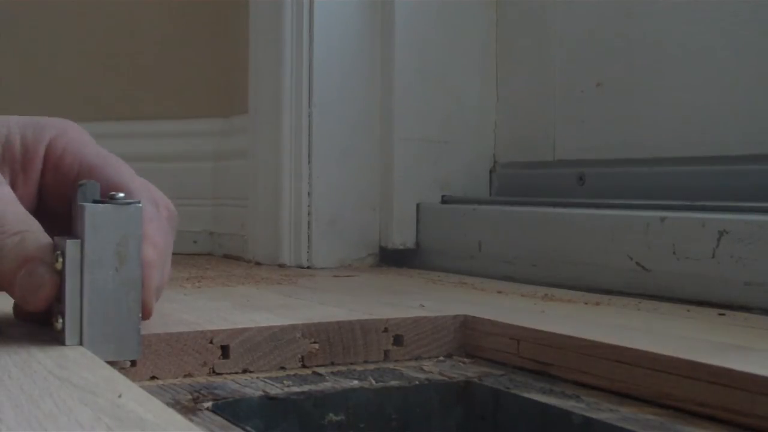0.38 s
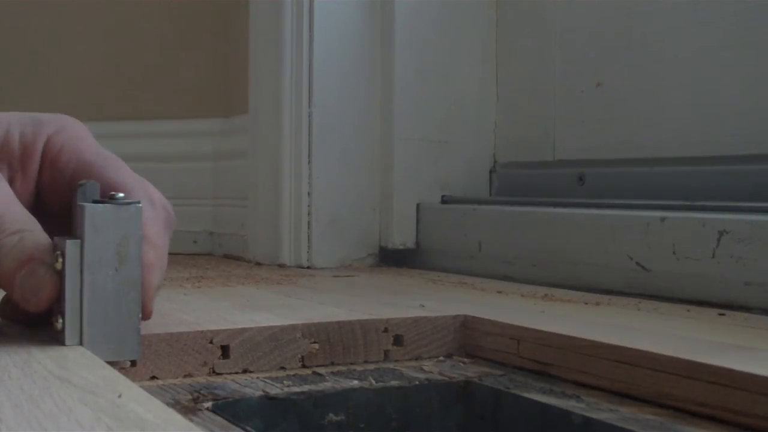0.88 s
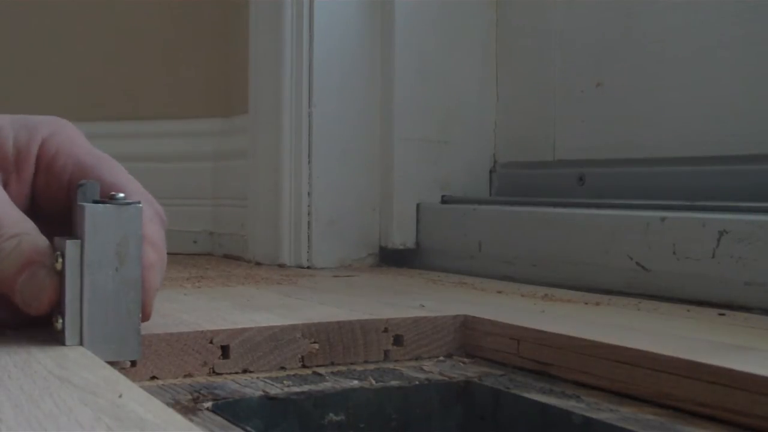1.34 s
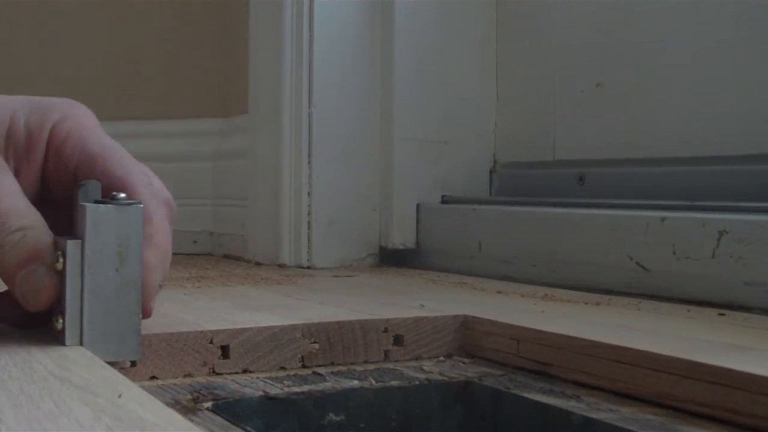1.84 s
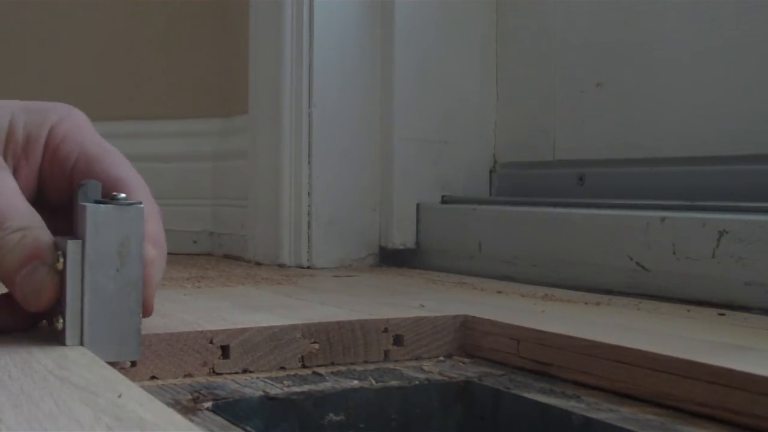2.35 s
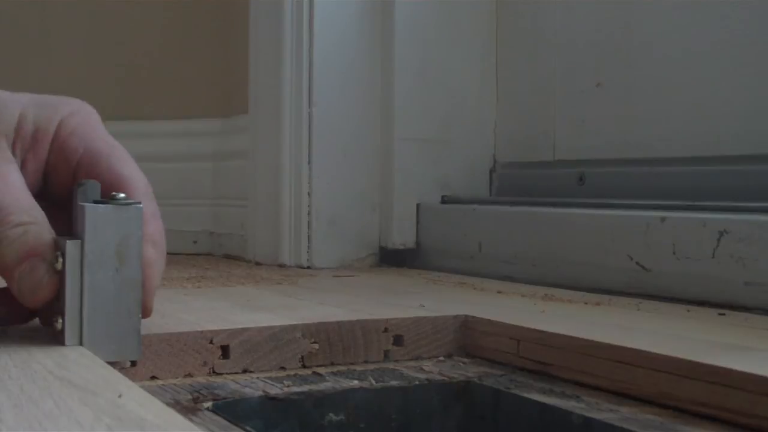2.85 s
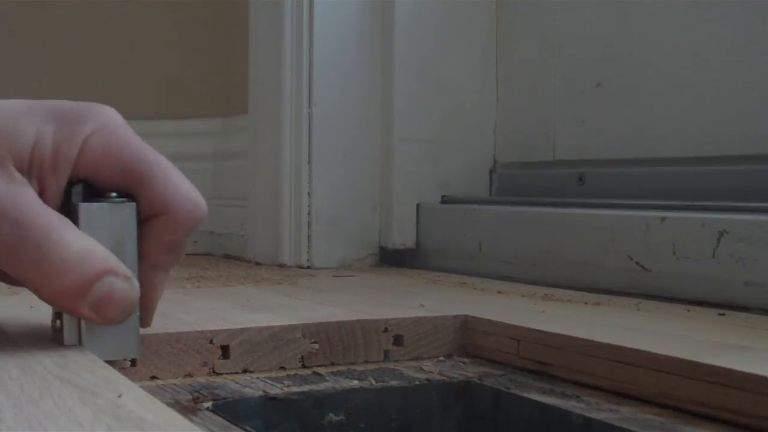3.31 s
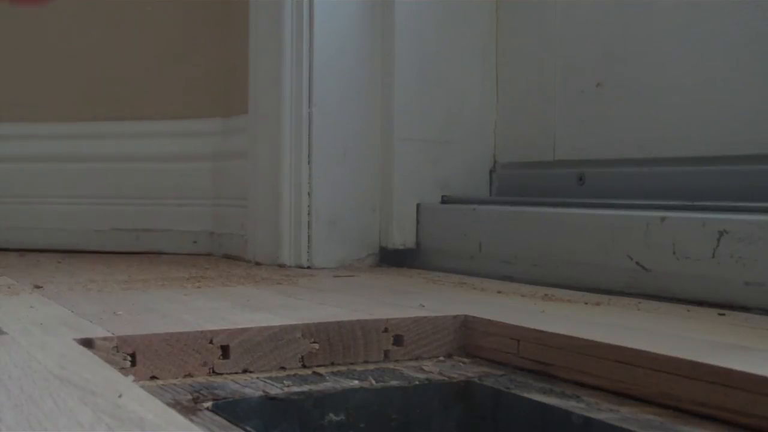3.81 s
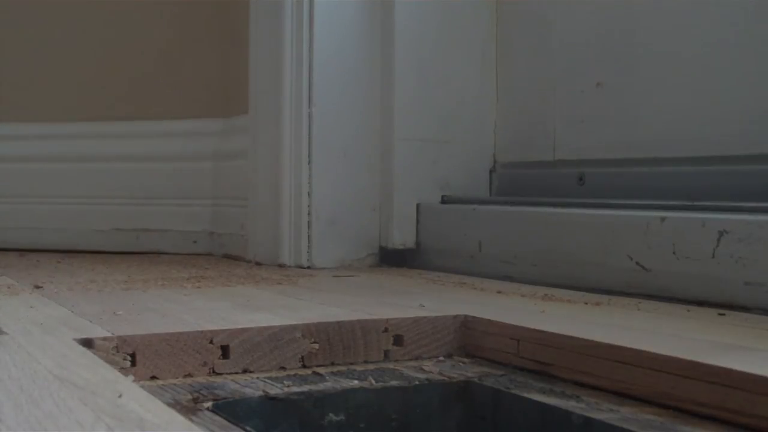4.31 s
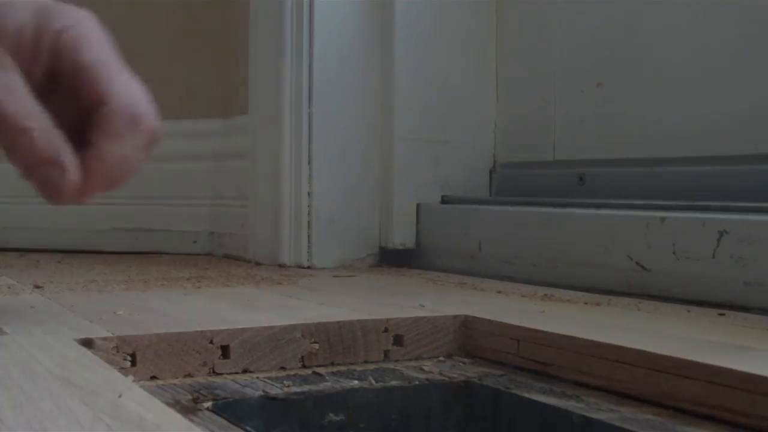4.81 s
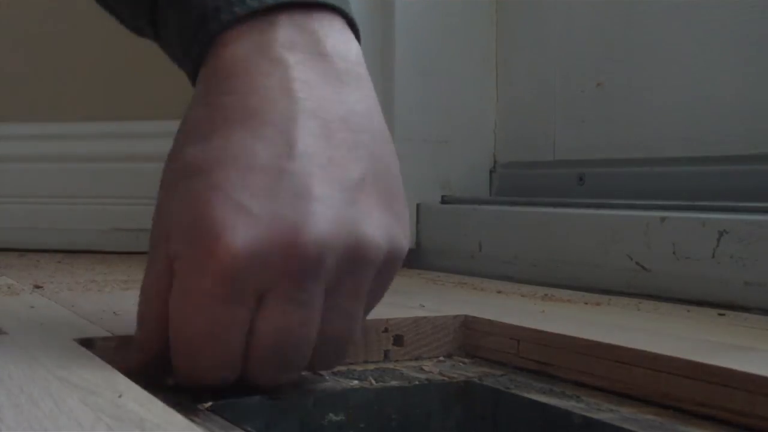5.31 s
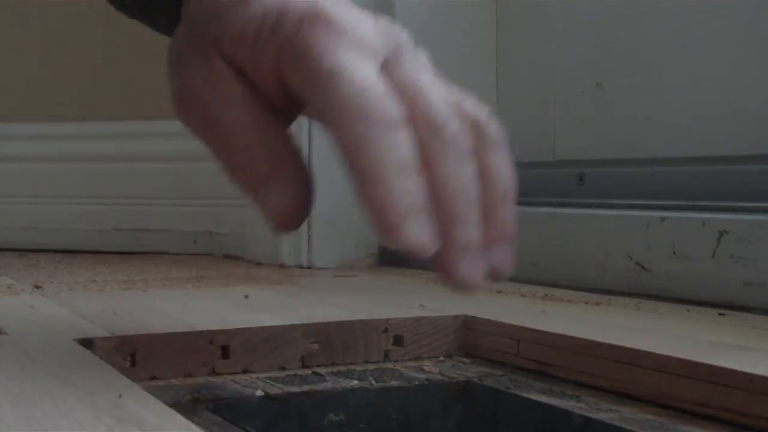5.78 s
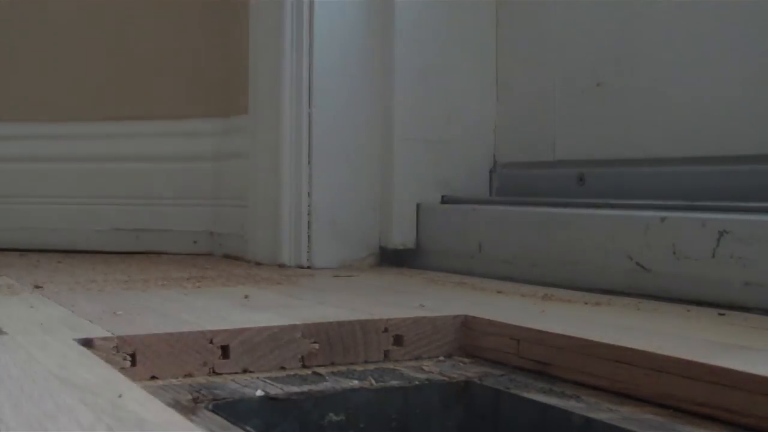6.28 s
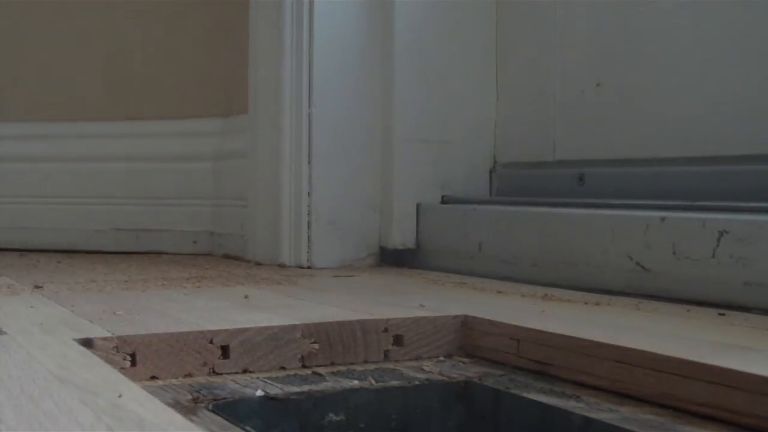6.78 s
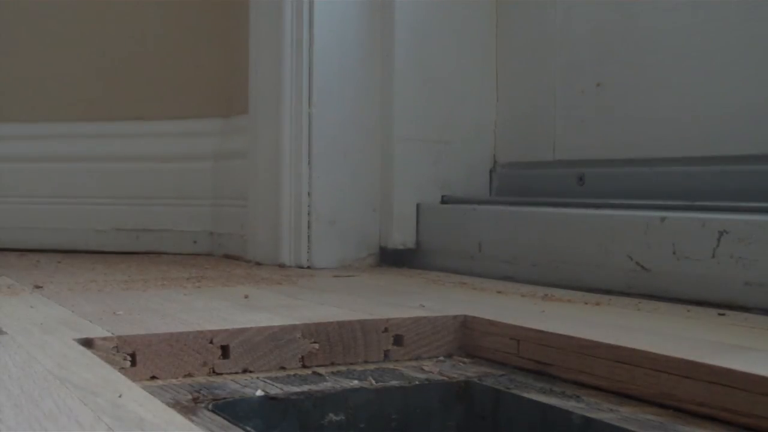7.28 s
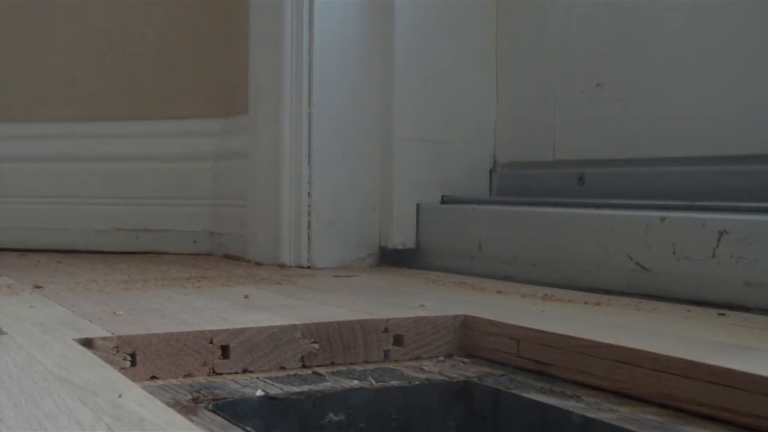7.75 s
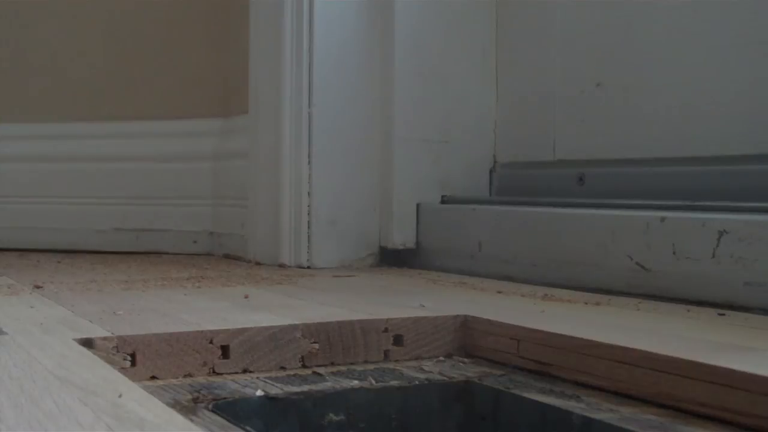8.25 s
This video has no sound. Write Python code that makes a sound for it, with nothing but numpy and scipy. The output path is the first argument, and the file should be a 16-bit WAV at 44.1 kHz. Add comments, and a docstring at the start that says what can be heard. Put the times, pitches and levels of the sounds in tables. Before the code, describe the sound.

Close handling rustle and dull knocks, a loud metallic rattle, a bright clattering drop on boards, fingernail scrapes, then two deep bouncing wood thumps.

```python
"""A bare room with a wooden floor, heard through one close microphone that overloads on the loud blows.
A steel corner chisel is worked loose from a cut-out, pried out with a rattle and dropped on the boards; fingers
scrape a chip from the corner; a piece of wood is knocked down twice and bounces. Impacts are noise bursts and pushes
through resonances of steel, wood and floor. Rustle and scrapes are grainy coloured noise, creaks are runs of short
ringing slips, drones are narrow noise bands, and an earlier blow dies away as decaying sines."""
import sys
import numpy as np
from scipy import signal
from scipy.fft import rfft, irfft, next_fast_len
from scipy.io import wavfile
from scipy.ndimage import map_coordinates

SR = 44100
rng = np.random.default_rng(int(sys.argv[2]) if len(sys.argv) > 2 else 0)


def linear_from_db(decibels):
    """Turn decibels (scalar or array-like) into linear amplitude factors; 0 gives 1."""
    return 10 ** (np.asarray(decibels, float) / 20)


def log_audio(samples):
    """Write samples as a 16-bit WAV file to the path given in sys.argv[1]."""
    # one column per channel
    frames = np.atleast_2d(samples).T
    # limit to full scale, then quantise
    limited = np.clip(frames, -1, 1)
    pcm = np.round(limited * 32767).astype(np.int16)
    wavfile.write(sys.argv[1], SR, pcm)


N = 380583  # length in samples

# Decay of the bare room. Each row: frequency in Hz, t60 in s.
ROOM_DECAY = [(100, 1.37), (165, 0.91), (250, 0.52), (600, 0.51), (1500, 0.46), (4000, 0.33), (10000, 0.24)]
# Colour of the room tone. Each row: frequency in Hz, relative level in dB.
ROOM_TONE = [(12, -13), (20, 3), (292, 1), (657, -6.5), (714, -6), (821, -8), (1520, -12.5), (2180, -24.5),
             (2730, -15), (3410, -22), (8120, -16), (14600, -25), (15900, -38)]
ROOM_TONE_DB = -51  # rms
# What is left of an earlier blow in the floor. Each row: frequency in Hz, starting level in dB, t60 in s.
AFTER_RING = [(163, -40, 5.4), (108, -47.5, 3.9), (346, -56, 0.87)]
# Faint drones. Each row: start in s, end in s, frequency in Hz, width in Hz, rms level in dB.
DRONES = [(6.667, 7.57, 291.6, 21.16, -54), (6.935, 7.142, 469, 68, -45.5),
          (8.507, 8.634, 450, 89.3, -39.5)]

# Runs of creaking slips. Each row: first slip in s, end in s, usual peak level in dB.
SLIP_RUNS = [(5.5477, 5.56, -44), (5.685, 5.7, -39), (5.882, 6.03, -40.5), (6.152, 6.23, -43.5),
             (6.7531, 6.77, -38), (6.9491, 7.03, -34.5)]
# Modes rung by each slip. Each row: frequency in Hz, relative level in dB, t60 in s.
CREAK_MODES = [(2570, 6, 0.02), (2344, -9, 0.029), (3500, -4, .03)]
SLIP_PERIOD_S, SLIP_JITTER_S = 0.0342, 0.001

# Steady rustle of skin and cloth while the worker moves. Each row: time in s, hiss level in dB, rub level in dB.
RUSTLE = [(0, -57.5, -59.5), (.74, -53, -65), (.8, -44.5, -49), (1.3, -50, -53.5), (1.6, -50, -53.5),
          (2.35, -47, -51), (2.6, -51, -55.5), (3.25, -56, -57.5), (3.84, -44, -47), (3.9, -55, -60),
          (4.0, -53.5, -59), (4.14, -49, -49.5), (4.32, -42.5, -49), (4.93, -47, -46.5), (5.16, -49, -48.5),
          (5.55, -50.5, -57), (6.12, -55, -56), (6.36, -68.5, -73), (6.45, -49, -50), (6.9, -46, -47),
          (7.3, -49, -49), (7.62, -49.5, -57.5), (8.0, -46, -35.5), (8.47, -49, -51.5), (8.63, -45, -43)]
RUSTLE_WAVER_DB, RUSTLE_WAVER_PER_S = 0.5, 12
# Single rubs that swell to a peak and die.
# Each row: peak time in s, hiss level in dB, rub level in dB, rise in s and fall in s for a factor e.
RUBS = [(.34, -57, -50.5, 0.026, 0.021), (.416, -50, -37.5, 0.0038, 0.014),
        (0.515, -45, -39, 0.011, 0.0069), (0.771, -60, -43, 0.0027, 0.044),
        (.951, -36.5, -44, 0.0068, 0.079), (1.139, -48.5, -46.5, 0.015, 0.027),
        (1.402, -43, -48.5, 0.01, 0.051), (1.586, -48, -45, .02, 0.091), (1.79, -44, -40.5, 0.016, 0.0097),
        (1.93, -35.5, -43, 0.034, 0.012), (2.05, -41.5, -45, 0.021, 0.026),
        (2.214, -36, -43.5, 0.056, 0.019), (2.5, -48.5, -55, 0.13, 0.021), (2.656, -54, -45, 0.049, 0.063),
        (2.898, -51.5, -50, 0.15, .05), (3.04, -46.5, -49, .03, 0.17), (3.418, -50.5, -43, .07, 0.013),
        (3.99, -44.5, -53, .004, 0.0054), (4.302, -54, -47, .006, 0.01), (5.206, -42, -52, 0.021, 0.012),
        (5.27, -44, -53, 0.024, 0.013), (6.642, -44, -45.5, 0.36, 0.018), (7.1, -33.5, -47, .08, 0.079),
        (7.369, -44.5, -52, 0.078, 0.041), (7.463, -47, -57, 0.0079, 0.05),
        (8.495, -43.5, -34.5, 0.0065, 0.02)]
# Hard scrapes over the wood, a list for each. Each row: time in s, hiss level in dB, rub level in dB.
SCRAPES = [
    [(1.81, -42, -63), (1.83, -21.5, -32), (1.86, -48, -43)],
    [(3.495, -50, -35.5), (3.515, -33.5, -24), (3.53, -14, -15), (3.60, -62, -24), (3.65, -50, -38),
     (3.70, -36, -47), (3.8, -45.5, -51)],
    [(5.33, -39, -56), (5.355, -39, -44), (5.37, -23, -58), (5.39, -30.5, -45), (5.405, -27, -36),
     (5.435, -31.5, -40), (5.46, -31.5, -38), (5.475, -39, -47)],
    [(5.70, -58, -45), (5.72, -37.5, -47), (5.745, -36.5, -28), (5.80, -32, -34.5), (5.812, -19, -27),
     (5.83, -29, -34), (5.842, -42, -48), (5.88, -46, -42)],
]
# Colour of the soft hiss. Each row: frequency in Hz, relative level in dB per Hz.
HISS_COLOUR = [(1180, -12.5), (2000, -0.5), (3510, -1), (3800, -4), (4560, 0.5), (8000, 2.5), (14300, -7.5),
               (15900, -11.5)]
# Colour of the duller rub. Each row: frequency in Hz, relative level in dB per Hz.
RUB_COLOUR = [(88, -43), (150, 2), (197, -5.5), (531, 2), (584, 0), (1330, 0), (4000, -12), (5200, -16.5),
              (8800, -120)]
# Colour of grinding and cracking. Each row: frequency in Hz, relative level in dB per Hz.
GRIND_COLOUR = [(880, -18), (1500, 6.5), (2560, 4.5), (2990, 7), (6340, 4.5), (7000, 10), (14100, -5),
                (15900, -26)]

# Bright ticks of steel and grit. Each row: time in s, peak level in dB, pitch in Hz.
TICKS = [(0.0757, -28, 6040), (0.1146, -26, 6250), (0.1411, -30.5, 7800), (0.2222, -23.5, 8120),
         (0.347, -29, 8700), (1.0784, -30, 4750), (3.188, -21.5, 5800), (3.486, -26, 9030),
         (3.5379, 0, 4500), (3.5668, -14, 8000), (3.5837, -5, 4480), (3.6145, 2.5, 6500),
         (3.6651, -12, 6900), (3.676, -1.5, 6900), (3.69, -1, 6950), (3.7878, -23.5, 6600),
         (3.9916, -24, 6160), (4.3016, -28, 4400), (4.349, -22, 4500), (4.448, -27, 4550),
         (4.4766, -24, 6500), (4.4966, -23.5, 5560), (5.26, -28, 6950), (5.2704, -25, 4730),
         (5.4515, -12, 6760), (5.6113, -29.5, 6060), (5.7503, -19, 7250), (5.7935, -10, 8000),
         (5.8101, -2.5, 7900), (5.8166, -1, 8050), (7.035, -15.5, 7930), (7.0798, -21, 9000),
         (7.104, -4.5, 8030), (7.1748, -23, 5300), (7.2499, -25, 8120), (7.2729, -24, 7900),
         (7.2783, -20.5, 8700), (7.3324, -19, 7800), (7.352, -18, 8500), (7.3637, -20.5, 8920),
         (7.378, -16, 8800), (7.3918, -18.5, 8000), (7.4604, -18, 7650), (7.4691, -22, 6340),
         (7.601, -14.5, 6100), (7.654, -13, 8600), (7.893, -33, 5600), (8.198, -25, 5560),
         (8.293, -26.5, 3985)]
TICK_T60_S = 0.0094  # of the contact noise
# Spells of loose grit. Each row: start in s, end in s, mean peak level in dB, median pitch in Hz.
GRIT = [(2.313, 2.37, -28, 7400), (3.378, 3.42, -27, 7500), (3.71, 3.77, -29, 6200),
        (5.155, 5.2, -33, 6000), (7.129, 7.28, -23, 7560), (7.398, 7.56, -30.5, 6600)]
GRIT_GAPS_PER_S = 35  # at the median gap
GRIT_SPREAD_DB, GRIT_SPREAD_OCTAVES = 3, 0.25

# Knocks on wood, faint to loud: handling, prying, and a bounce each of the chisel and the piece of wood.
# Each row: time in s, peak level of the local ring in dB, pitch in Hz,
# length in s (it scales the contact noise and narrows the resonance), crack level relative to the ring in dB.
KNOCKS = [(0.311, -28.5, 272, 0.032, -6), (0.413, -32.5, 347, 0.039, -11), (0.506, -33.5, 807, 0.077, -16),
          (0.687, -35, 775, 0.06, -9), (0.77, -25, 846, 0.091, -4), (0.95, -30, 2400, 0.051, 1),
          (1.274, -35, 1080, 0.052, -23), (1.769, -23.5, 2520, 0.033, 3), (1.823, -23, 759, 0.15, 3),
          (1.931, -8, 606, 0.028, -30), (2.05, -20.5, 814, 0.046, -21), (2.291, -15.5, 730, 0.046, -33),
          (2.401, -31, 468, 0.12, 3.5), (2.42, -35, 403, 0.075, 9.5), (2.505, -26, 766, 0.099, -19),
          (2.609, -19, 393, 0.019, -46), (2.64, -20.5, 465, 0.027, -13), (2.721, -29.5, 1210, 0.057, -14),
          (2.87, -30, 1460, 0.026, -4), (2.887, -29, 460, 0.08, -15.5), (2.979, -7, 750, 0.053, -24),
          (3.007, -12.5, 1124, 0.049, -10), (3.282, -27.5, 710, 0.083, -20), (3.319, -25, 338, 0.061, -29),
          (3.395, -29.5, 324, 0.12, -12.5), (3.418, -33.5, 304, 0.06, 8.5), (3.514, -11, 1240, 0.074, -7),
          (3.532, -3.5, 990, 0.083, -10), (3.527, -7.5, 242, 0.068, -25), (3.54, 2.5, 1080, 0.055, -0.5),
          (3.549, 4, 840, 0.062, -36), (3.567, 2, 1170, 0.058, 1), (3.614, -4, 880, 0.036, 4.5),
          (3.618, -13.5, 250, 0.035, -27), (3.633, -3, 1045, 0.05, -22), (3.644, -9.5, 337, 0.073, 0.5),
          (3.789, -22.5, 2030, 0.033, -3), (4.836, -5.5, 340, 0.062, -37), (5.063, -28, 360.6, 0.043, -10),
          (5.197, -27.5, 1080, 0.046, -12), (5.306, -35.5, 1120, 0.1, 7), (5.713, -21, 220, 0.07, -22),
          (5.747, -15, 315, 0.024, -4.5), (5.761, -14.5, 249, 0.056, -21), (5.778, -13.5, 260, 0.05, -2),
          (5.797, -17.5, 220, 0.059, -15), (7.922, -16.5, 696, 0.04, -27)]
SHAKE_DB, SHAKE_DB_PER_OCTAVE = -17, -2  # how much a 500 Hz knock shakes the boards; duller knocks go deeper

# Modes of the floor boards. Each row: frequency in Hz, width in Hz, usual level in dB.
BOARD_MODES = [(101.5, 11.4, -12), (163.3, 31, -4), (274, 26, -10.5), (343, 18.6, -1), (456.4, 48, -5.5),
               (529, 33, -2.5), (759, 97, -5.5), (984, 117, 1), (1085, 225, -3), (1330, 205, -4.5),
               (1563, 32, -7.5), (2090, 960, -8), (3140, 280, -24.5)]
# Body modes of the piece of wood. Each row: frequency in Hz, width in Hz, usual level in dB.
PIECE_MODES = [(494, 240, 3), (805, 370, 1.5)]
# The piece of wood lands and bounces. Each row: time in s, thump peak in dB, clack relative to the thump in dB.
THUDS = [(7.674, 9.5, -26), (7.711, 6.5, -7.5), (7.735, -8, -2), (7.764, -7, -8.5), (7.850, -23, -2),
         (7.882, -12.5, -21), (7.948, 9, -22), (7.954, 11, -22), (8.008, 5.5, -24), (8.023, 4, -18),
         (8.052, 3.5, -27), (8.098, -21, -15), (8.155, -23, -21)]
HARD_HZ, HARD_OCTAVES_PER_DB = 630, 0.2  # contact cut-off of a 0 dB thud; stronger blows make shorter contacts

# Modes of the chisel. Each row: frequency in Hz, width in Hz, usual level in dB.
STEEL_MODES = [(3880, 160, -11), (4710, 100, -13), (5800, 60, -11), (6230, 17, 4), (6560, 80, -13),
               (7350, 150, -13), (7880, 100, -13), (8600, 220, -7), (10400, 150, -16), (10900, 100, -16)]
# The chisel lands and bounces. Each row: time in s, steel level in dB, boards level in dB.
DROP = [(4.655, 7, 10), (4.665, 0.5, 6), (4.673, -48, 7.5), (4.699, 0, 6.5), (4.721, -16, -15),
        (4.762, -31, -17.5), (4.844, -25, -12)]
DROP_DEEP_DB, DROP_DEEP_HZ = -17, 260  # the weight of the tool also drives the low board modes

MIC_TOP_HZ = 10200  # the capsule rolls off above this


def unit(x):
    """Scales to rms 1."""
    return x / np.sqrt(np.mean(x ** 2) + 1e-20)


def top(x):
    """Scales to peak 1."""
    return x / np.max(np.abs(x))


def filtered(x, response):
    """Multiplies the spectrum of x by a complex response of frequency."""
    m = next_fast_len(len(x) + 8192)
    return irfft(rfft(x, m) * response(np.fft.rfftfreq(m, 1 / SR)), m)[:len(x)]


def along(points, hz):
    """Reads (Hz, value) points on a log frequency axis."""
    f, v = np.transpose(points)
    return np.interp(np.log(hz + 1), np.log(f + 1), v)


def colour(points):
    """Turns (Hz, dB) points into a filter response."""
    return lambda f: linear_from_db(along(points, f))


def wobble(per_s):
    """A smooth random curve with so many knots a second."""
    return map_coordinates(rng.standard_normal(400), [np.arange(N) * per_s / SR])


def peak(f, hz, width_hz):
    """One causal resonance."""
    return 1j * f * width_hz / (hz * hz - f * f + 1j * f * width_hz)


def modes(f, table, scatter_db):
    """A set of resonances, neighbours in opposite phase; each contact point drives them at new strengths."""
    total = 0
    for k, (hz, width_hz, db) in enumerate(table):
        strength = linear_from_db(db + scatter_db * rng.standard_normal())
        total = total + (-1) ** k * strength * peak(f, hz, width_hz)
    return total


def boards(f):
    """Floor modes over a broad bed of dense small ones; little deep bass is radiated."""
    bed = linear_from_db(-14) * peak(f, 515, 920)
    return (modes(f, BOARD_MODES, scatter_db=4.5) + bed) * (1j * f / (1j * f + 70)) ** 2


def puff(t60, rise_s, size=8192):
    """A burst of contact noise that rises fast and dies away."""
    t = np.arange(size) / SR
    decay = linear_from_db(-60 * t / max(t60, 0.002))
    return rng.standard_normal(size) * decay * (1 - np.exp(-t / rise_s))


def blow(t60, rise_s, push):
    """A contact force: one push a millisecond long and chatter; too brief and small for deep bass."""
    force = puff(t60, rise_s)
    force[:48] += push * np.hanning(48)
    return filtered(force, lambda f: (1j * f / (1j * f + 75)) ** 2)


def add(out, s, sound, room_db):
    """Places a sound with a room tail of its own: each frequency dies at its own speed."""
    noise = rng.standard_normal(SR * 3 // 4)
    hz, t, z = signal.stft(noise, SR, nperseg=256)
    decay = linear_from_db(-60 * t / along(ROOM_DECAY, hz)[:, None])
    tail = signal.istft(z * decay, SR, nperseg=256)[1]
    tail = tail * (1 - np.exp(-np.arange(len(tail)) / SR / 0.0014))  # walls need a few ms to answer
    wet = linear_from_db(room_db) * signal.fftconvolve(sound, tail / np.linalg.norm(tail))
    wet[:len(sound)] += sound
    at = out[round(s * SR):]
    at[:len(wet)] += wet[:len(at)]


def grainy(spectrum, grains_per_s, spread_db, share):
    """Coloured noise of rms 1, a share of its power in uneven decaying grains."""
    starts = rng.random(N) < grains_per_s / SR
    sizes = starts * linear_from_db(spread_db * rng.standard_normal(N))
    envelope = np.convolve(sizes, np.exp(-np.arange(132) / 30))[:N]
    grains = envelope * rng.standard_normal(N)
    mix = np.sqrt(share) * unit(grains) + np.sqrt(1 - share) * rng.standard_normal(N)
    return unit(filtered(mix, colour(spectrum)))


def strokes(tables):
    """Gain curves of hiss and rub, silent between the strokes."""
    t = np.arange(N) / SR
    gains = 0
    for rows in tables:
        s, *columns = np.transpose(rows)
        edge = np.clip(np.minimum(t - s[0], s[-1] - t) / 0.011 + 0.5, 0, 1)
        gains = gains + edge * linear_from_db([np.interp(t, s, column) for column in columns])
    return gains


def background():
    """Steady room tone and the slightly unsteady decaying sines left of an earlier blow."""
    t = np.arange(N) / SR
    flutter_db = 2.2 * wobble(5)
    ring = 0
    for hz, db, t60 in AFTER_RING:
        ring = ring + linear_from_db(db - 60 * t / t60 + flutter_db) * np.sin(2 * np.pi * hz * t)
    return ring + linear_from_db(ROOM_TONE_DB) * grainy(ROOM_TONE, 55, 1.1, 0.044)


def drones():
    """Narrow bands of noise that swell and fade, heard as faint wavering tones."""
    t = np.arange(N) / SR
    out = np.zeros(N)
    for start, end, hz, width_hz, db in DRONES:
        fade = np.clip(np.minimum(t - start, end - t) / 0.026, 0, 1)
        band = filtered(rng.standard_normal(N), lambda f: peak(f, hz, width_hz) ** 2)
        out += linear_from_db(db) * fade * unit(band)
    return out


def creak():
    """Something under load slips about thirty times a second; each slip rings a few short modes."""
    out = np.zeros(N)
    t = np.arange(2048) / SR
    ring = sum(linear_from_db(db - 60 * t / t60) * np.sin(2 * np.pi * hz * t) for hz, db, t60 in CREAK_MODES)
    ring = top(ring * (1 - np.exp(-t / 0.0029)))
    for first, end, db in SLIP_RUNS:
        for s in np.arange(first, end, SLIP_PERIOD_S):
            late, size = rng.standard_normal(2)
            start = s - 0.002 + SLIP_JITTER_S * late  # the ring needs time to rise
            add(out, start, linear_from_db(db + 1.3 * size) * ring, room_db=-25)
    return out


def rustling():
    """Gains of hiss and rub: the wavering steady rustle plus single rubs with exponential flanks."""
    t = np.arange(N) / SR
    gains = strokes([RUSTLE]) * linear_from_db(RUSTLE_WAVER_DB * wobble(RUSTLE_WAVER_PER_S))
    for s, hiss_db, rub_db, rise_s, fall_s in RUBS:
        swell = np.exp(np.minimum((t - s) / rise_s, (s - t) / fall_s))
        gains = gains + linear_from_db([[hiss_db], [rub_db]]) * swell
    return gains


def friction():
    """Skin and cloth hiss softly; steel and nails grind the wood in coarser grains that shake the boards."""
    hiss, rub = rustling()
    soft = hiss * grainy(HISS_COLOUR, 600, 3.3, 0.36) + rub * grainy(RUB_COLOUR, 300, 2.0, 0.26)
    hiss, rub = strokes(SCRAPES)
    grind = hiss * grainy(GRIND_COLOUR, 1100, 4.7, 0.52)
    shake = rub * unit(filtered(grainy(RUB_COLOUR, 230, 7.2, 0.9), boards))
    return soft + grind + shake


def grit():
    """Loose grit: tick rows scattered at random over each spell, twelve at most."""
    rows = []
    for start, end, db, hz in GRIT:
        gap, size, pitch = rng.standard_normal((12, 3)).T
        s = start + np.cumsum(np.exp(0.6 * gap)) / GRIT_GAPS_PER_S
        levels_db = db + GRIT_SPREAD_DB * size
        pitches_hz = hz * 2 ** (GRIT_SPREAD_OCTAVES * pitch)
        rows += list(zip(s, levels_db, pitches_hz))[:np.sum(s < end)]
    return rows


def ticks():
    """Tiny hard contacts: a click with one high resonance on a broad skirt."""
    out = np.zeros(N)
    for s, db, hz in TICKS + grit():
        contact = puff(TICK_T60_S, 0.00066, size=2048)
        click = filtered(contact, lambda f: peak(f, hz, 0.13 * hz) + linear_from_db(-11) * peak(f, hz, 1.7 * hz) ** 2)
        click = filtered(click, lambda f: 1 / (1 + 1j * f / 9000) ** 2)  # contacts too long for the top octave
        add(out, s, linear_from_db(db) * top(click), room_db=-20)
    return out


def knocks():
    """A push and a short scuff ring a local resonance and shake the boards; a crack rides on it."""
    out = np.zeros(N)
    for s, db, hz, length_s, crack_db in KNOCKS:
        contact = puff(0.5 * length_s, 0.001, size=4096)
        contact[:12] += 1.42 * np.hanning(12)  # the first push, a quarter millisecond long
        width_hz = 7 / max(length_s, 0.005)  # the quicker it dies, the broader the resonance
        local = filtered(contact, lambda f: peak(f, hz, width_hz) + linear_from_db(-11) * peak(f, 1.44 * hz, 0.24 * hz))
        deep = filtered(contact, lambda f: boards(f) / (1 + 1j * f / 400) ** 2)
        crack = filtered(puff(0.48 * length_s, 0.00057, size=4096), colour(GRIND_COLOUR))
        deep_db = SHAKE_DB + SHAKE_DB_PER_OCTAVE * np.log2(hz / 500)
        sound = top(local) + linear_from_db(crack_db) * top(crack) + linear_from_db(deep_db) * top(deep)
        add(out, s, linear_from_db(db) * sound, room_db=-13.5)
    return out


def thuds():
    """Wood on wood: a soft contact passes little treble into the boards; the piece clacks and slaps faintly."""
    out = np.zeros(N)
    for s, db, clack_db in THUDS:
        hard_hz = HARD_HZ * 2 ** (HARD_OCTAVES_PER_DB * db)

        def wood(f):
            """Floor and piece together, dulled by the soft contact."""
            return (boards(f) + modes(f, PIECE_MODES, scatter_db=2)) / (1 + 1j * f / hard_hz) ** 2

        thump = filtered(blow(0.019, 0.00017, push=0.31), wood)
        clack = filtered(puff(0.052, 0.00014), lambda f: peak(f, 1700, 810) ** 2)
        slap = filtered(puff(0.044, 0.00017), colour(GRIND_COLOUR))
        sound = top(thump) + linear_from_db(clack_db) * top(clack) + linear_from_db(-28) * top(slap)
        add(out, s, linear_from_db(db) * sound, room_db=-9)
    return out


def drop():
    """Each bounce rattles the steel, loose in its guide, and thumps the boards with a hard, bright contact."""
    out = np.zeros(N)
    for s, steel_db, boards_db in DROP:
        ring = filtered(puff(0.042, 0.0044, size=16384), lambda f: modes(f, STEEL_MODES, scatter_db=3.5))
        crack = filtered(puff(0.07, 0.0002), colour(GRIND_COLOUR))
        thump = filtered(blow(0.038, 0.00015, push=0.5),
                         lambda f: boards(f) + linear_from_db(-0.5) * peak(f, 1420, 1070) ** 2)
        deep = filtered(blow(0.05, 0.0005, push=1.5),
                        lambda f: boards(f) * peak(f, DROP_DEEP_HZ, DROP_DEEP_HZ) ** 2)
        thump = top(thump) + linear_from_db(DROP_DEEP_DB) * top(deep)
        add(out, s, linear_from_db(steel_db) * top(ring), room_db=-9)
        add(out, s, linear_from_db(steel_db - 1) * top(crack) + linear_from_db(boards_db) * thump, room_db=-6.5)
    return out


def scene():
    """All sources reach one microphone that feeds both channels."""
    far = background() + drones() + creak()
    near = friction() + ticks() + knocks()
    mono = far + near + thuds() + drop()
    return np.tile(mono, (2, 1))


def band_limit(x):
    """A steep low-pass at the top of the band."""
    return signal.sosfilt(signal.butter(12, 16020, fs=SR, output="sos"), x)


def record(dry):
    """The close capsule dulls the treble; its input stage clips with a sharp knee just under full scale."""
    x = np.array([filtered(channel, lambda f: 1 / (1 + 1j * f / MIC_TOP_HZ)) for channel in dry])
    x = x / (1 + np.abs(x / 0.98) ** 12) ** (1 / 12)
    return band_limit(x)


dry = scene()
out = record(dry)
log_audio(out)
```